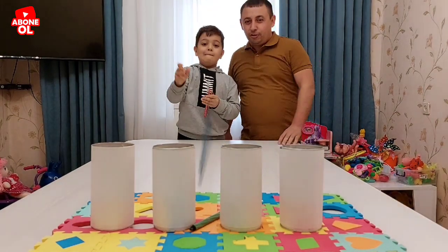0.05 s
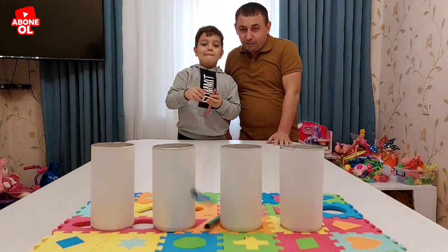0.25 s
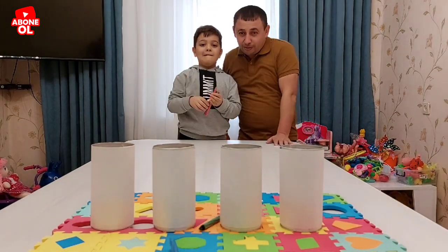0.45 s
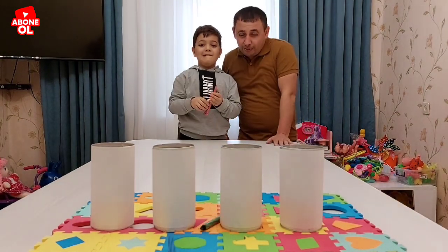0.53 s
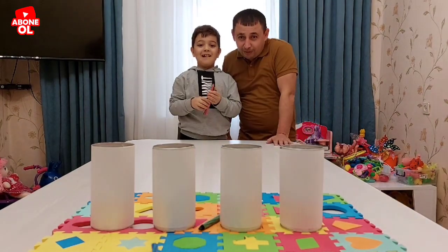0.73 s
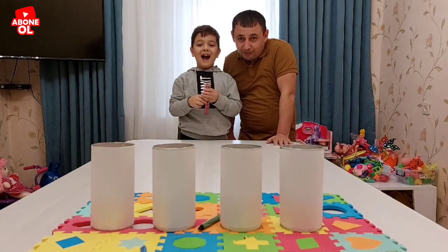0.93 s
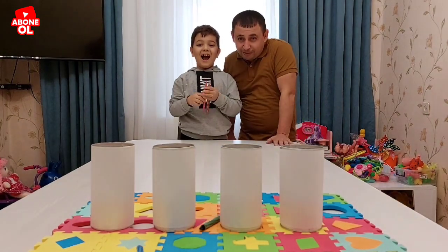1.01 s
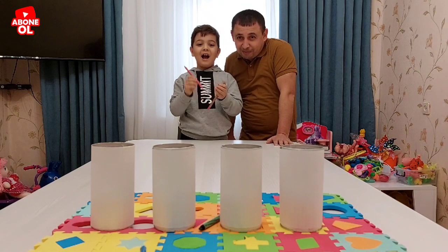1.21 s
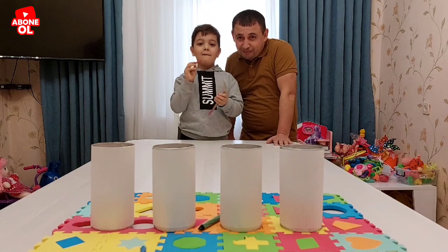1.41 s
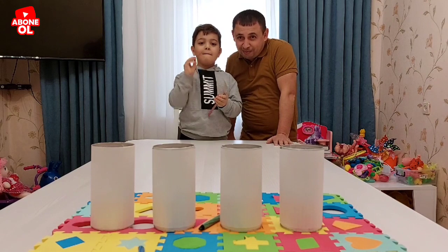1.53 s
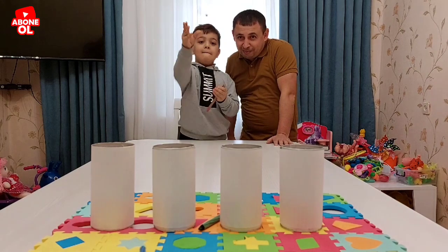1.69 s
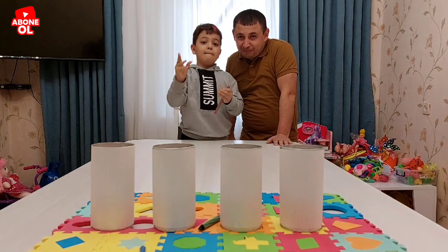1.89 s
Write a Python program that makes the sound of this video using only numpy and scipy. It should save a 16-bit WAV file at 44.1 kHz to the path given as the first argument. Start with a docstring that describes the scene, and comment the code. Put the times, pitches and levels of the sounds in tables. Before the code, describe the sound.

Hard clicks of a pen bouncing among plastic cups on a booming table, then falling off.

```python
"""A thrown pen lands among plastic cups on a mat-covered table: three knocks, two lighter touches.
Each contact is a hard plastic click plus the boom of the table top, answered by a small furnished room.
The pen then clatters dully on the floor. Two faint ticks, soft thuds and brushing sleeves follow
over a low room rumble and a thin rustle."""
import sys
import numpy as np
from scipy import signal
from scipy.fft import rfft, irfft
from scipy.io import wavfile
from scipy.ndimage import uniform_filter1d, minimum_filter1d

SR = 44100
rng = np.random.default_rng(int(sys.argv[2]) if len(sys.argv) > 2 else 0)


def inscribe(sig):
    """Save sig as 16-bit PCM at rate SR to the path in sys.argv[1].

    A 1-D sig is mono; a 2-D sig holds one channel per row.
    Samples are clipped to [-1, 1] before scaling.
    """
    pcm = np.round(np.clip(np.atleast_2d(sig).T, -1, 1) * 32767)
    wavfile.write(sys.argv[1], SR, pcm.astype(np.int16))


N = 85995

# Pen contacts. Each row: start in seconds, direct, room and boom gains in dB, left-right difference in dB,
# leading resonance in Hz, its boost in dB, then click colour in dB for eight bands.
KNOCKS = [ (0.2011, -21, -11.5, -11, 1.8, 1250, 2, 8.4, 3.5, 1.5, 3.5, -2.5, -1, -12, -25.5),
          (0.2222, 1, 3.5, 3.5, 2.7, 5700, 3, 15, 6, 8, 15.5, 15, 3.5, 0, -12.5),
          (0.2892, -14, -12.5, -9, 2, 1820, 4, 4, 5, 14.5, 10, 6, 0, -16, -25.5),
          (0.3726, 0, -1, -4.5, 1.7, 2240, 4, 13, 19, 11, 12.5, 4.5, 5, -18, -16),
          (0.4781, -5.5, -9, -10, 5.3, 3900, 4, 3.3, 4.5, 14.5, 9, 5.5, 8.5, -2, -12.5)]
# Resonances of pen barrel and cups. Each row: frequency in Hz, width in Hz, boost in dB.
BARREL = [(1230, 220, 2.5), (1403, 46, 5), (1715, 70, 4.5), (1980, 280, 6.5), (2514.5, 70, 3.5),
          (2754, 220, 3.5), (3950, 260, 4.5), (5774, 390, 6), (7800, 400, 4.5)]
ROOM_GAP_S = .005


def pen():
    """Each contact briefly rings barrel and cups, favouring one resonance, and sets off the room."""
    bands_hz = [450, 760, 1150, 2000, 2900, 4300, 7500, 14000]  # The eight colour bands of KNOCKS.
    # The pen's other end slaps down. Each row: knock time in seconds, delay in seconds, gain in dB.
    slaps = [(.2220, .00108, -7), (.4784, 0.00089, -8)]
    bass_db, lead_width_hz = -13, 260
    out = np.zeros((2, N))
    for start_s, direct_db, room_db, _, pan_db, lead_hz, lead_db, *bands_db in KNOCKS:
        colour = [(60, bands_db[0] + bass_db), *zip(bands_hz, bands_db)]
        click = pulse(colour, [*BARREL, (lead_hz, lead_width_hz, lead_db)])
        near = amp(direct_db) * direct(click, pan_db)
        add(out, start_s, near)
        for knock_s, delay_s, slap_db in slaps:
            if abs(knock_s - start_s) < .01:
                add(out, start_s + delay_s, amp(slap_db) * near)
        add(out, start_s + ROOM_GAP_S, amp(room_db) * pan(db=1.37) * in_room(click))
    return -out


def table_top():
    """The top heaves and booms under each contact: clear modes in a dense low ring."""
    # Each row: frequency in Hz, level in dB, T60 in seconds.
    modes = [(59.9, -47, 1.2), (87.9, -43, 0.97), (113.8, -45, 0.57), (143.4, -46, 0.5204),
             (200.5, -40, .5), (241.1, -29, 0.47), (286, -34.5, .5), (315, -31.5, .5), (338.2, -34.5, .5),
             (383.3, -26.5, 0.28), (434.5, -23.5, 0.14), (479.4, -29, .26), (561.5, -38, 0.31),
             (697, -40, 0.083)]
    # Spectra. Each row: frequency in Hz, level in dB.
    boom = [(35, -21), (60, 9), (120, 9), (200, 26.5), (300, 26.5), (450, 21), (700, 17), (1200, -13),
            (3000, -41)]  # dense ringing of the table and what stands on it
    heave = [(40, -22), (120, -3), (290, 20), (420, 21), (560, 13.5), (800, -6.5), (2000, -28.5),
             (6000, -59.5)]  # first push of the top
    delay_s, rise_s = .002, .004
    out, t = np.zeros((2, N)), np.arange(N) / SR
    ring = sum(amp(db) * decay(t, t60_s) * np.sin(2 * np.pi * hz * t) for hz, db, t60_s in modes)
    ring *= 1 - np.exp(-t / rise_s)
    for start_s, direct_db, _, boom_db, *_ in KNOCKS:
        add(out, start_s + delay_s, amp(boom_db) * (ring + in_room(pulse(boom))))
        add(out, start_s + delay_s, -amp(direct_db) * pulse(heave))
    return out


def floor_clatter():
    """The pen hits the floor. Screened by the table, it arrives dull and mostly via the room."""
    bounces = [(.6261, -12.5), (.6283, -15), (.634, -18), (0.649, -21), (0.723, -38)]  # Each row: start in seconds, gain in dB.
    colour = [(60, -1.5), (200, 6), (400, 11), (600, 8.5), (1300, 7.5), (2600, 6), (3400, -4),
              (5500, -12.5), (8000, -23.5), (14000, -24)]  # Each row: frequency in Hz, level in dB.
    direct_db, room_db = -6.5, 1.5
    out, clack = np.zeros((2, N)), pulse(colour, BARREL)
    for start_s, db in bounces:
        add(out, start_s, -amp(db + direct_db) * direct(clack, pan_db=2.5))
        add(out, start_s, amp(db + room_db) * in_room(clack))
    return out


def ticks():
    """Faint light ticks off to the left, with their room echo."""
    events = [(0.9033, -38.5), (0.955, -28)]  # Each row: start in seconds, gain in dB.
    colour = [(300, -29), (2500, -16), (4500, -13.5), (5700, -6), (9000, -10.5), (15000, -20)]  # Each row: frequency in Hz, level in dB.
    room_db = 3.5
    out, tick = np.zeros((2, N)), pulse(colour)
    for start_s, db in events:
        add(out, start_s, amp(db) * direct(tick, pan_db=14.5))
        add(out, start_s + ROOM_GAP_S, amp(db + room_db) * in_room(tick))
    return out


def thuds():
    """Soft, dull thuds of movement, heard only via the room."""
    events = [(.985, -21.5), (1.035, -20.5), (1.84, -8.5), (1.9, -19)]  # Each row: start in seconds, gain in dB.
    colour = [(50, -11.5), (130, 1.5), (260, -1.5), (450, -10), (800, -23.5), (2000, -38.5), (8000, -42)]  # Each row: frequency in Hz, level in dB.
    out = np.zeros((2, N))
    for start_s, db in events:
        add(out, start_s, amp(db) * in_room(pulse(colour)))
    return out


def sleeves():
    """Cloth brushes softly: noise that swells and dies."""
    brushes = [(0.844, 0.12, -69.5), (1.016, 0.07, -75), (1.104, 0.064, -76.5)]  # Each row: start in seconds, length in seconds, level in dB.
    colour = [(100, -10), (300, -4.5), (520, -3), (750, -8), (1250, -9.5), (2500, -19), (6000, -20.5),
              (15000, -23)]  # Each row: frequency in Hz, level in dB.
    out, noise = np.zeros((2, N)), diffuse(colour)
    for start_s, length_s, db in brushes:
        progress = np.clip((np.arange(N) / SR - start_s) / length_s, 0, 1)
        out += amp(db) * np.sin(np.pi * progress) * noise / noise.std()
    return pan(db=-1.5) * out


def room_air():
    """Steady low rumble under a thin rustle that swells and fades."""
    # Spectra. Each row: frequency in Hz, relative level in dB.
    rumble_colour = [(15, -41.5), (25, -8.5), (134, -1.5), (190, -14.5), (229, -8), (394, -20.5),
                     (560, -22.5), (840, -30), (911, -30.5), (13600, -41.5), (16000, -44)]
    rustle_colour = [(200, -21), (2500, -12.5), (6000, -4.5), (9000, -4), (15000, -7.5)]
    rumble_coherence = [(60, .85), (300, 0.6), (1000, 0.5), (4000, 0)]  # Each row: frequency in Hz, left-right coherence 0-1.
    rustle_envelope = [(0, -90), (0.548, -79), (0.689, -66), (0.792, -82.5), (.9, -76), (1.05, -89),
                       (1.141, -80), (1.35, -94), (1.95, -97.5)]  # Each row: time in seconds, level in dB.
    rumble, rustle = diffuse(rumble_colour, rumble_coherence), diffuse(rustle_colour)
    rumble_db = -68.5
    rustle_db = np.interp(np.arange(N) / SR, *np.transpose(rustle_envelope))
    return pan(db=5.5) * (amp(rumble_db) * rumble / rumble.std() + amp(rustle_db) * rustle / rustle.std())


def direct(click, pan_db):
    """Straight path, left channel first, plus a short scatter from the cups."""
    right_lag_s, smear_s_per_hz = .00006, .0007 / 2e4  # treble lags bass
    cups_db, cups_t60_s, cups_rise_s = -12, .025, .002
    size = click.shape[1]
    hz, t = np.fft.rfftfreq(size, 1 / SR), np.arange(size) / SR
    delay_s = np.array([[0], [right_lag_s]]) + smear_s_per_hz * hz
    scatter = rng.standard_normal((2, size)) * decay(t, cups_t60_s) * np.minimum(t / cups_rise_s, 1)
    path = np.exp(-2j * np.pi * hz * delay_s) + amp(cups_db) * rfft(scatter / np.linalg.norm(scatter[0]))
    fade = np.cos(np.linspace(0, np.pi / 2, size)) ** 2
    return pan(pan_db) * irfft(rfft(click) * path, size) * fade


def in_room(click, size=512):
    """Room echo of a click: strong early reflections, then a decay by band."""
    room_t60 = [(60, 1), (250, 0.53), (600, 0.4), (2000, 0.38), (4500, 0.34), (13000, 0.36)]  # Each row: frequency in Hz, T60 in seconds.
    early_db, early_t60_s, rise_s = 4, .11, .004
    hop = size // 4
    hz, t, noise = signal.stft(diffuse(), SR, nperseg=size, noverlap=size - hop)
    fade = np.hypot(decay(t, at_hz(room_t60, hz)[:, None]), amp(early_db) * decay(t, early_t60_s))
    fade /= np.sqrt((fade ** 2).sum(1, keepdims=True) * hop)  # equal energy per band
    response = signal.istft(noise * fade, SR, nperseg=size, noverlap=size - hop)[1][:, :N]
    response *= 1 - np.exp(-np.arange(N) / SR / rise_s)
    return signal.fftconvolve(click, response, axes=1)[:, :N]


def diffuse(colour=None, coherence=None):
    """Stereo noise, alike in the bass and nearly unrelated in the treble."""
    room_coherence = [(60, 0.75), (300, .92), (480, .4), (700, .3), (1500, 0.1), (4000, 0), (14000, 0.1)]  # Each row: frequency in Hz, left-right coherence 0-1.
    hz = np.fft.rfftfreq(N, 1 / SR)
    mid, side = rfft(rng.standard_normal((2, N)))
    alike = np.clip(at_hz(room_coherence if coherence is None else coherence, hz), 0, 1)
    spectrum = mid * np.sqrt((1 + alike) / 2) + np.array([[1], [-1]]) * side * np.sqrt((1 - alike) / 2)
    return irfft(spectrum * (1 if colour is None else amp(at_hz(colour, hz))), N)


def pulse(colour, peaks=(), size=4096):
    """Minimum-phase click with the given spectrum and resonances."""
    hz = np.fft.rfftfreq(size, 1 / SR)
    peaks_db = sum(db / (1 + (2 * (hz - peak_hz) / width_hz) ** 2) for peak_hz, width_hz, db in peaks)
    level_db = at_hz(colour, hz) + peaks_db
    log_gain = np.log(amp(np.r_[level_db, level_db[-2:0:-1]]))
    spectrum = np.exp(np.conj(signal.hilbert(log_gain)))
    return np.fft.ifft(spectrum).real[None, :size // 2]


def amp(db):
    """Decibels to gain."""
    return 10 ** (np.asarray(db) / 20)


def decay(t, t60_s):
    """Envelope falling 60 dB in t60_s."""
    return 1000. ** (-t / t60_s)


def pan(db):
    """Channel gains for a left-right difference."""
    return amp(np.array([[db], [-db]]) / 2)


def at_hz(points, hz):
    """Interpolates a table on a log-frequency axis."""
    points_hz, values = np.transpose(points)
    return np.interp(np.log(hz + 1), np.log(points_hz + 1), values)


def add(mix, start_s, sound):
    """Adds a sound to the stereo mix."""
    part = mix[:, round(start_s * SR):][:, :sound.shape[-1]]
    part += sound[..., :part.shape[1]]


def scene():
    """Pen, table and background together."""
    return pen() + table_top() + floor_clatter() + ticks() + thuds() + sleeves() + room_air()


def record(dry):
    """Quick peak limiter, soft top end and band limit."""
    ceiling_db, limiter_s, rolloff_hz, edge_hz = -.5, .001, 15000, 15900
    hz, span = np.fft.rfftfreq(N, 1 / SR), round(limiter_s * SR)
    allowed_gain = np.minimum(1, amp(ceiling_db) / (abs(dry).max(0) + 1e-9))
    gain = uniform_filter1d(minimum_filter1d(allowed_gain, span), span)
    soft = irfft(rfft(dry * gain) / np.sqrt(1 + (hz / rolloff_hz) ** 20), N)
    lowpass = signal.firwin(255, edge_hz, window=("kaiser", 9), fs=SR)
    return signal.oaconvolve(soft, lowpass[None], "same")


dry = scene()
out = record(dry)
inscribe(out)
```